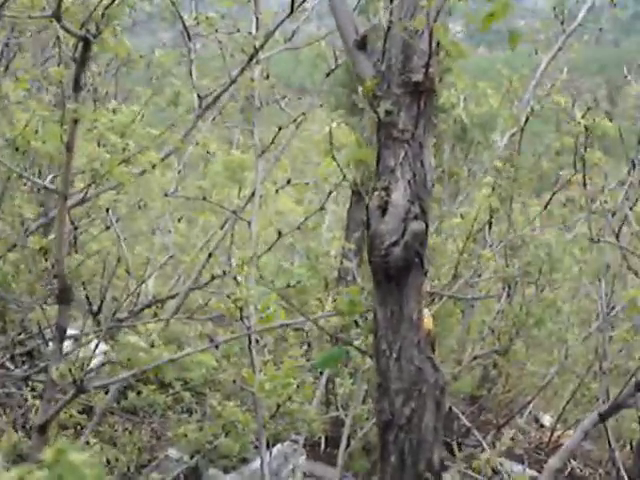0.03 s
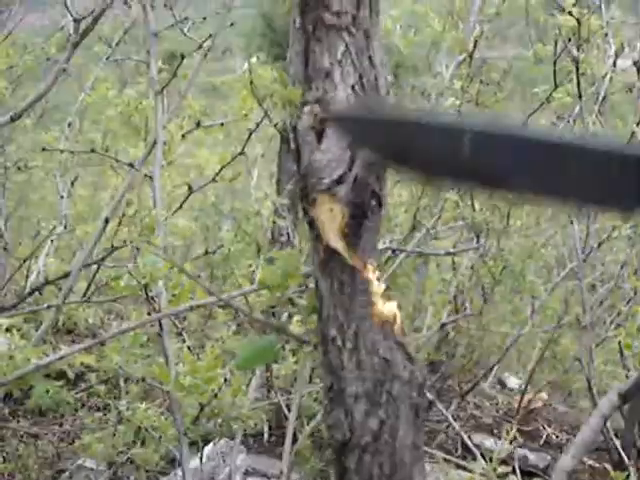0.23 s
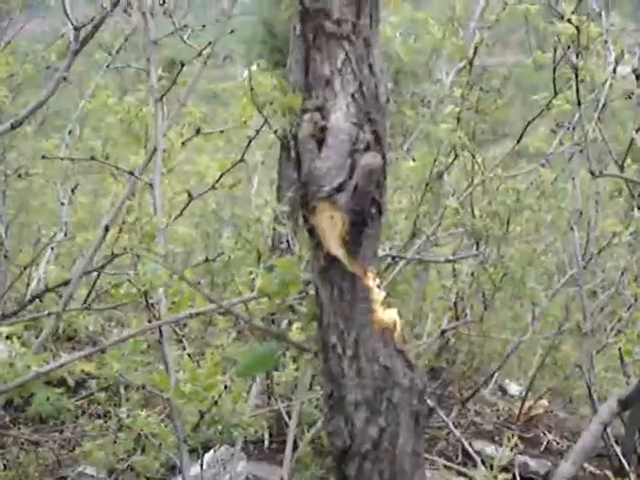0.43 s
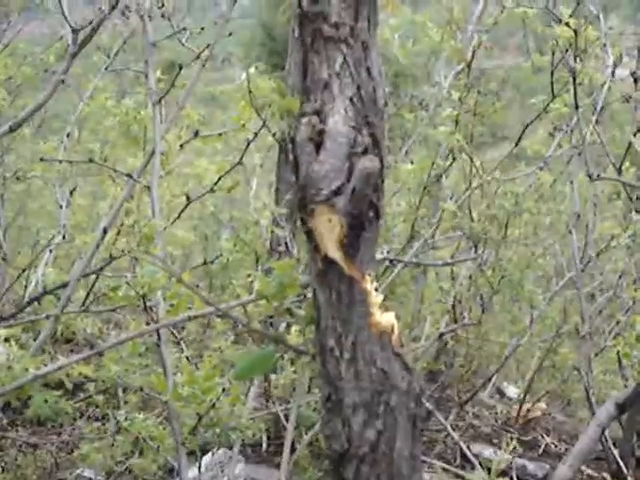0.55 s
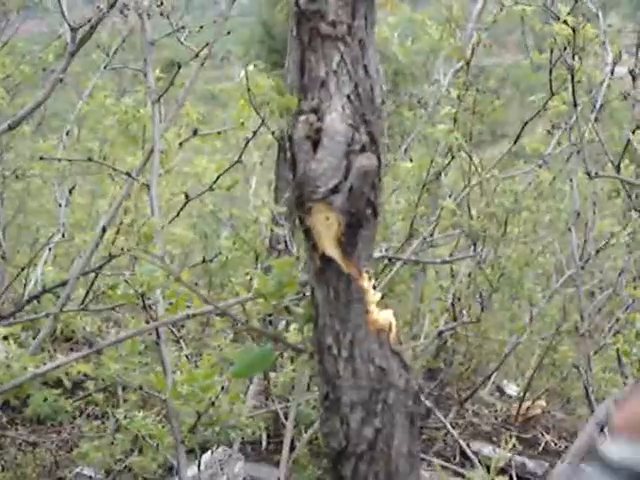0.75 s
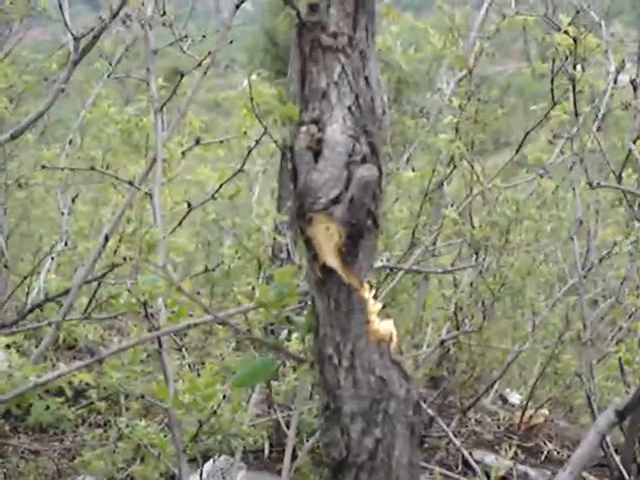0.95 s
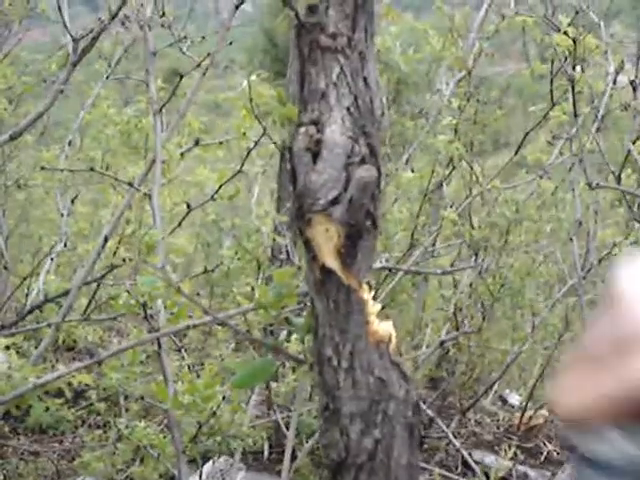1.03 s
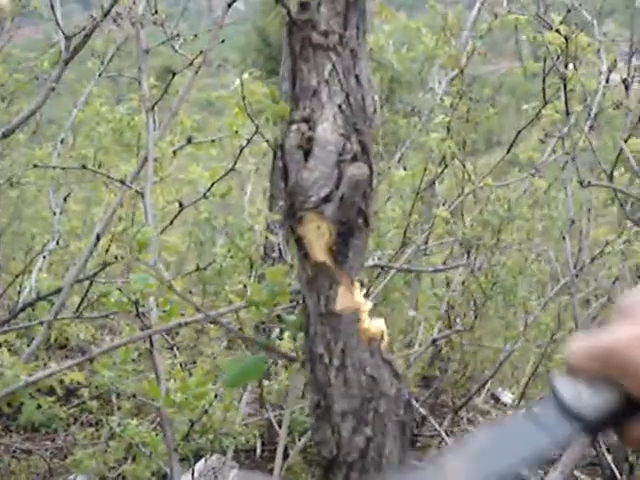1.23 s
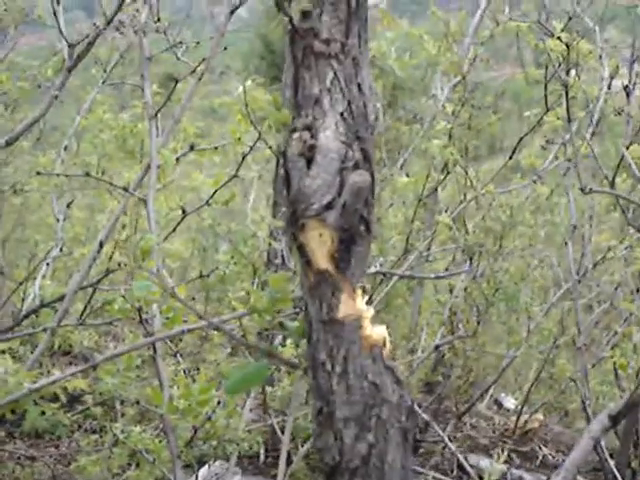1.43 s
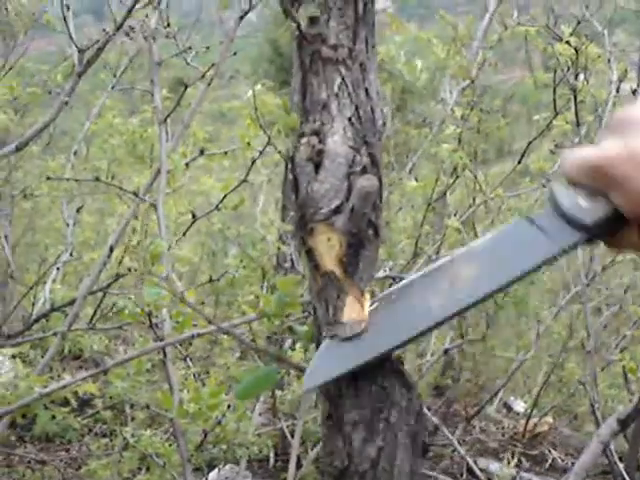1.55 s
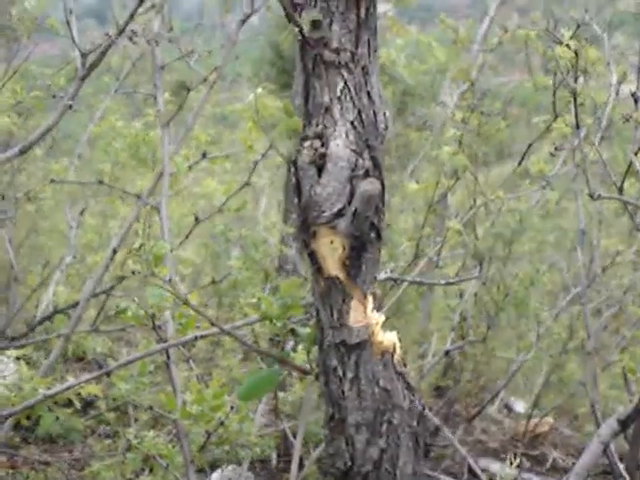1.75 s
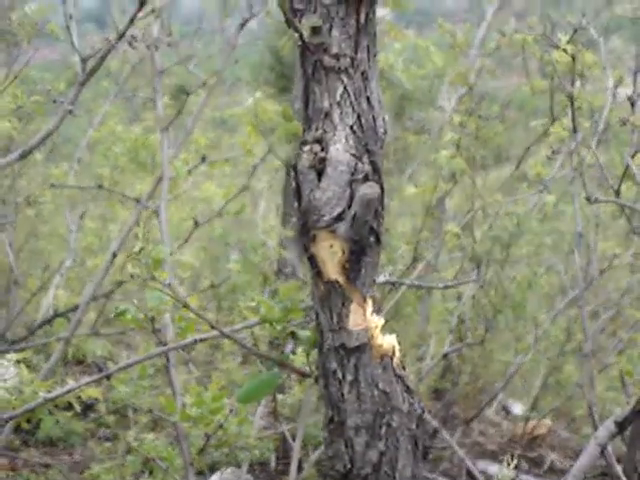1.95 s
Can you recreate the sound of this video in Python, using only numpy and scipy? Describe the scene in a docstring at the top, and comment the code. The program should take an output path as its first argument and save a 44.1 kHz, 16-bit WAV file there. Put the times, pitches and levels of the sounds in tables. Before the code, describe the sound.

Three close, sharp chops of a big blade bite into a slim tree in woodland, each with a soft echo. A splinter snaps after the first; the last two come closer together. Twigs tick and leaves rustle over faint hiss.

```python
"""A large blade chops three times into a thin tree trunk in woodland, close to the microphone.
Leaves rustle and chips tap over faint hiss. At 0.23 s the edge strikes with a crack, fibres tear for a
few milliseconds, the blade stops with a knock and the trunk thuds; the trees return a soft echo.
The blade scrapes in the cut, a splinter snaps and twigs tick. Two more chops follow at 1.25 s and
1.70 s, each with its echo, rustling leaves and falling chips."""
import sys
import numpy as np
from scipy import signal
from scipy.fft import rfft, irfft
from scipy.io import wavfile
from scipy.ndimage import uniform_filter1d

SR = 44100
rng = np.random.default_rng(int(sys.argv[2]) if len(sys.argv) > 2 else 0)


def wav_out(sig):
    """Save sig, one row per channel (or a flat mono array), as 16-bit PCM at SR to the path in sys.argv[1]."""
    wavfile.write(sys.argv[1], SR, np.round(np.clip(np.atleast_2d(sig).T, -1, 1) * 32767).astype(np.int16))


N = 88200
T = np.arange(N) / SR

# Blows of the blade: start_s, crack_db, crack_hz, crack_width_ratio, blade_db, fibre_db, bite_s,
# knock_hz, knock_db, trunk_db, tilt_db_per_octave, aftermath_db
BLOWS = [(0.2280, -8.5, 2810, 0.24, -16, -24.5, 0.0068, 1853, -19.5, -45.5, 2.0, -6),
         (1.2512, -7, 1360, 1, -17.5, -24, 0.0035, 1300, -33, -36, 0, -1),
         (1.6950, -5, 2080, 1, -27, -25.5, .0028, 1944, -26.5, -40, -2.5, -9)]


def undb(db):
    """Decibels to amplitude gain."""
    return 10 ** (np.asarray(db) / 20)


def unit(x):
    """Scale to rms 1."""
    return x / np.sqrt(np.mean(x ** 2))


def fade(t, t60):
    """Exponential damping: 1 until t = 0, then 60 dB down every t60 seconds."""
    return np.exp(-np.log(1000) * np.maximum(t, 0) / t60)


def swell(start, rise_s, t60_s):
    """Envelope with a linear rise and an exponential decay."""
    return np.clip((T - start) / rise_s, 0, 1) * fade(T - start - rise_s, t60_s)


def colour(x, spectrum, size=4096):
    """Minimum-phase filtering with unit energy, shaped by (frequency_hz, level_db) points."""
    hz, db = np.array(spectrum, float).T
    bins_hz = np.maximum(np.arange(size // 2 + 1) * SR / size, 1)
    gain = undb(np.interp(np.log(bins_hz), np.log(hz), db))
    cepstrum = irfft(np.log(gain))
    cepstrum[1:size // 2] *= 2  # folding the cepstrum makes the filter causal
    cepstrum[size // 2 + 1:] = 0
    response = irfft(np.exp(rfft(cepstrum)))
    return signal.fftconvolve(x, response / np.sqrt(np.sum(response ** 2)))[:N]


def noise(spectrum):
    """Filtered Gaussian noise, rms 1."""
    return unit(colour(rng.standard_normal(N), spectrum))


def crackle(spectrum, per_s, spread_db):
    """Shot noise: dense random clicks of uneven but bounded size, rms 1."""
    hits = rng.random(N) < per_s / SR
    sizes = undb(spread_db * np.minimum(rng.exponential(size=N), 3))
    signs = np.sign(rng.standard_normal(N))
    return unit(colour(hits * signs * sizes, spectrum))


def ring(modes, start, pitch=1):
    """Free vibration: a sum of damped modes, neighbours swinging in opposite directions."""
    t = np.maximum(T - start, 0)
    return sum((-1) ** k * undb(db) * np.sin(2 * np.pi * hz * pitch * t) * fade(t, t60)
               for k, (hz, db, t60) in enumerate(modes))


def wander(rate_hz):
    """Slow random modulation, rms 1."""
    hold = int(SR / rate_hz)
    steps = np.repeat(rng.standard_normal(N // hold + 1), hold)
    return unit(uniform_filter1d(steps, hold)[:N])


def background():
    """Broadband hiss under a thin whine, made unsteady by slight frequency modulation."""
    # Spectral density of the hiss: frequency_hz, level_db
    hiss_spectrum = [(20, -12), (60, -8), (125, -4), (270, 0), (400, -1.5), (600, -2.5), (1900, -7),
                     (2700, -8.5), (7000, -9.5), (9700, -12), (10500, -24), (16000, -24.5)]
    # Tones of the whine: pitch_hz, level_db
    tones = [(8009, -76), (8038, -69.5), (8070, -80), (11854, -85.5)]
    wander_hz, hiss_db = 1.94, -61.5
    whine = 0
    for hz, db in tones:
        phase = 2 * np.pi * np.cumsum(hz + wander_hz * wander(rate_hz=34)) / SR
        whine += undb(db) * np.sqrt(2) * np.sin(phase)
    return noise(hiss_spectrum) * undb(hiss_db + 0.13 * wander(rate_hz=3.7)) + whine


def leaves():
    """Dry leaves and bark chips rustle: many tiny contacts add up to bursts of shot noise."""
    # Rustles: start_s, rise_s, t60_s, level_db
    rustles = [(.017, 0.0036, 0.16, -53.5), (0.069, 0.011, 0.11, -59), (0.118, 0.0025, 0.14, -54.5),
               (.343, 0.0022, 0.034, -46.5), (1.286, 0.00082, 0.17, -51), (1.315, 0.012, 0.11, -50.5),
               (1.349, 0.0012, 0.053, -42.5), (1.362, 0.0014, 0.053, -53), (1.385, 0.0022, 0.19, -51.5),
               (1.455, 0.001, 0.081, -56), (1.768, 0.0024, 0.037, -49.5), (1.7945, 0.0016, 0.04, -44),
               (1.801, 0.0015, 0.052, -49.5), (1.918, 0.0052, 0.55, -58)]
    # Spectrum of the contacts: frequency_hz, level_db
    spectrum = [(100, -8.5), (500, -20.5), (900, -0.5), (1300, 2), (2600, -2), (5000, -6), (9500, -8),
                (11000, -25), (16000, -30)]
    envelope = sum(undb(db) * swell(start, rise, t60) for start, rise, t60, db in rustles)
    return crackle(spectrum, per_s=2500, spread_db=3.0) * envelope


def twigs():
    """Twigs tick: each brief transient spreads its energy over a wide band."""
    # Ticks: start_s, level_db
    ticks = [(.568, -50), (0.764, -48), (1.286, -53), (1.674, -72), (1.807, -46)]
    # Spectrum of a tick: frequency_hz, level_db
    spectrum = [(100, -19), (1500, -0.5), (4500, -0.5), (9000, 3), (11000, -5), (16000, -17)]
    envelope = sum(undb(db) * swell(start, rise_s=0.0004, t60_s=0.02) for start, db in ticks)
    return noise(spectrum) * envelope


def falling_chips():
    """Impact on the ground excites the damped modes of small pieces of wood."""
    # Landings: start_s, pitch_hz, level_db
    landings = [(.034, 440, -46.5), (.106, 766, -48.5), (0.12, 1910, -49), (0.138, 395, -47.5),
                (.475, 1170, -51.5), (1.354, 1125, -53), (1.802, 1183, -41), (1.934, 2310, -51)]
    # Modes of a chip: pitch_ratio, level_db, t60_s
    modes = [(1.0, -3, 0.038), (1.4, -1.5, 0.015), (2.2, -36, 0.0099)]
    return sum(undb(db) * ring(modes, start, hz) for start, hz, db in landings)


def splinter():
    """Brittle fracture: a splinter strains, then snaps, in two bursts of clicks."""
    # Strain and snap: start_s, rise_s, t60_s, level_db
    bursts = [(.380, 0.0034, 0.032, -47), (0.3853, 0.006, 0.0052, -37)]
    # Spectrum of the fracture: frequency_hz, level_db
    spectrum = [(100, -14), (1000, -14.5), (1700, -7), (2700, -5.5), (3600, 2.5), (5800, 0), (7000, -11),
                (9500, -12.5), (11000, -23), (16000, -19)]
    envelope = sum(undb(db) * swell(start, rise, t60) for start, rise, t60, db in bursts)
    return crackle(spectrum, per_s=9000, spread_db=-2.7) * envelope


def scrape():
    """Friction of steel on wood in the first cut makes a fading run of tiny clicks."""
    # Spectrum of the friction: frequency_hz, level_db
    spectrum = [(100, -6), (1000, -12), (2500, -11), (4000, -2.5), (5800, -7), (7000, -9.5), (9500, -7.5),
                (11000, -24), (16000, -24)]
    envelope = undb(-46.5) * swell(start=0.246, rise_s=0.013, t60_s=0.27)
    return crackle(spectrum, per_s=3000, spread_db=2.0) * envelope


def aftermath():
    """Scattering by near stems, a delayed reflection from far trees and the shaken trunk's rumble."""
    # Sound scattered by nearby stems: frequency_hz, level_db
    near_spectrum = [(60, -60), (170, 10.5), (300, 16.5), (550, 21), (850, 4), (1250, 15.5), (2600, 3),
                     (5000, -8), (9000, -97), (16000, 4)]
    # Echo from a line of trees further off: frequency_hz, level_db
    far_spectrum = [(100, -3), (850, -24.5), (1220, 3), (1450, -14.5), (1750, -7.5), (2100, -12.5),
                    (2650, -10), (5000, -46.5), (16000, -26)]
    echo_delay_s, rumble_cutoff_hz = 0.093, 44.3
    near, far = noise(near_spectrum), noise(far_spectrum)
    lowpass = signal.butter(2, rumble_cutoff_hz, fs=SR, output="sos")
    shake = unit(signal.sosfilt(lowpass, rng.standard_normal(N)))
    out = 0
    for start, *_, aftermath_db in BLOWS:
        scatter = undb(-56) * near * swell(start, rise_s=0.06, t60_s=0.64)
        echo = undb(-48.5) * far * swell(start + echo_delay_s, rise_s=0.019, t60_s=0.21)
        rumble = undb(-54.5) * shake * swell(start, rise_s=0.012, t60_s=0.62)
        out += undb(aftermath_db) * (scatter + echo + rumble)
    return out


def thud(start, tilt_db):
    """Modal response of the trunk to a short push; tilt_db makes each thud brighter or duller."""
    # Modes of the trunk: pitch_hz, level_db, t60_s
    modes = [(130, -3, .15), (169.8, 0.5, 0.16), (252, -5, 0.02), (381, -5.5, 0.051), (419, 0, 0.075),
             (527, -6.5, 0.078), (850, -8, 0.074), (1184, -0.5, .03)]
    lowest_hz, push_s = modes[0][0], 0.0024
    tilted = [(hz, db + tilt_db * np.log2(hz / lowest_hz), t60) for hz, db, t60 in modes]
    return ring(tilted, start) * np.clip((T - start) / push_s, 0, 1)


def crack(start, centre_hz, width_ratio):
    """The edge meets the wood: an impulse excites a heavily damped resonance, peak 1."""
    # Spectrum of the contact pulse: frequency_hz, level_db
    spectrum = [(60, -13.5), (300, -0.5), (1200, 0), (3000, 4.5), (6000, 5), (9500, -4), (11000, -9),
                (16000, -8)]
    impulse = np.zeros(N)
    impulse[int(start * SR)] = 1
    pulse = colour(impulse, spectrum)
    resonance = signal.lfilter(*signal.iirpeak(centre_hz, 1 / width_ratio, fs=SR), pulse)
    contact = resonance + undb(-10) * pulse
    return contact / np.abs(contact).max()


def chops():
    """Impact, fracture, arrest: the edge cracks, fibres tear, and the stopping blade knocks the wood."""
    # Spectrum of tearing fibres: frequency_hz, level_db
    fibre_spectrum = [(60, -6.5), (300, -5), (470, 3.5), (750, -11.5), (1200, -6), (1700, 0.5), (2500, 0),
                      (3600, 3), (6000, -10.5), (9500, -5), (11000, -17), (16000, -17.5)]
    # Modes of the blade, choked at once by the wood: pitch_hz, level_db, t60_s
    blade_modes = [(3010, -3.5, 0.0072), (3395, -35, 0.02), (4610, -17, 0.027), (7120, -5.5, 0.015),
                   (9630, -22.5, 0.042)]
    # Modes of the wood that grips the blade: pitch_ratio, level_db, t60_s
    knock_modes = [(.85, -9, 0.017), (1.0, 3.5, 0.013), (1.14, -8, 0.033), (1.8, -8, 0.0096),
                   (2.0, -51, .014)]
    split_hz, fibre_t60_s = 1970, 0.026
    fibres = crackle(fibre_spectrum, per_s=18000, spread_db=3.5)
    dull = signal.sosfiltfilt(signal.butter(3, split_hz, fs=SR, output="sos"), fibres)
    out = 0
    for (start, crack_db, crack_hz, width_ratio, blade_db, fibre_db, bite_s,
         knock_hz, knock_db, trunk_db, tilt_db, _) in BLOWS:
        stop = start + bite_s
        contact = undb(crack_db) * crack(start, crack_hz, width_ratio)
        blade = undb(blade_db) * ring(blade_modes, start)
        treble = (fibres - dull) * fade(T - start, t60=13.6 * bite_s)  # dulls as the blade slows
        tearing = undb(fibre_db) * (dull + treble) * (T >= start) * fade(T - stop, fibre_t60_s)
        knock = undb(knock_db) * ring(knock_modes, stop, knock_hz)
        # The trunk is pushed once on entry and again, more weakly, as the blade stops.
        trunk = undb(trunk_db) * (thud(start, tilt_db) + undb(-6) * thud(stop, tilt_db))
        out += contact + blade + tearing + knock + trunk
    return out


def scene():
    """Superposition of all sources at one microphone."""
    chopping = chops() + aftermath() + scrape()
    debris = leaves() + splinter() + twigs() + falling_chips()
    return (chopping + debris + background())[None]


def record(dry):
    """Band limiting: the recorder's steep low-pass filter removes the highest treble."""
    cutoff_hz = 16500
    return signal.sosfilt(signal.ellip(8, 0.2, 70, cutoff_hz, fs=SR, output="sos"), dry)


dry = scene()
out = record(dry)
wav_out(out)
```